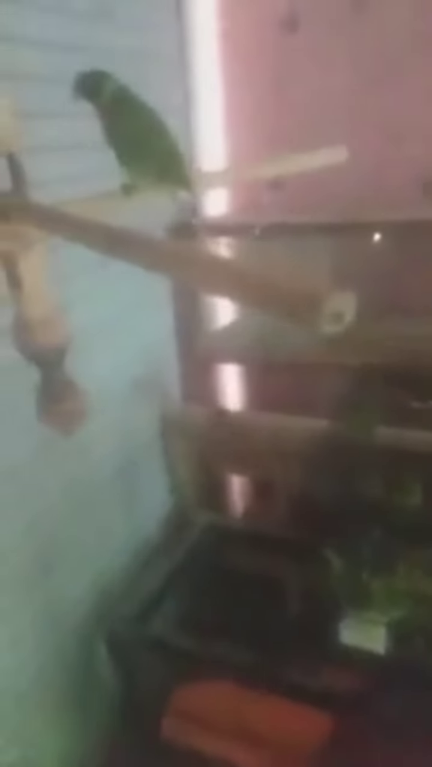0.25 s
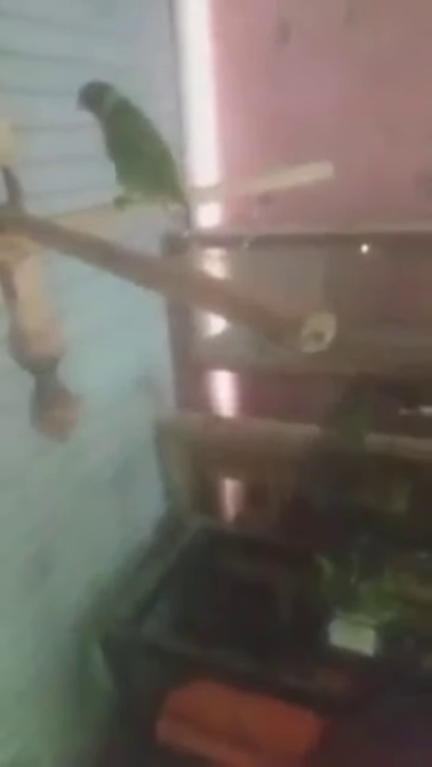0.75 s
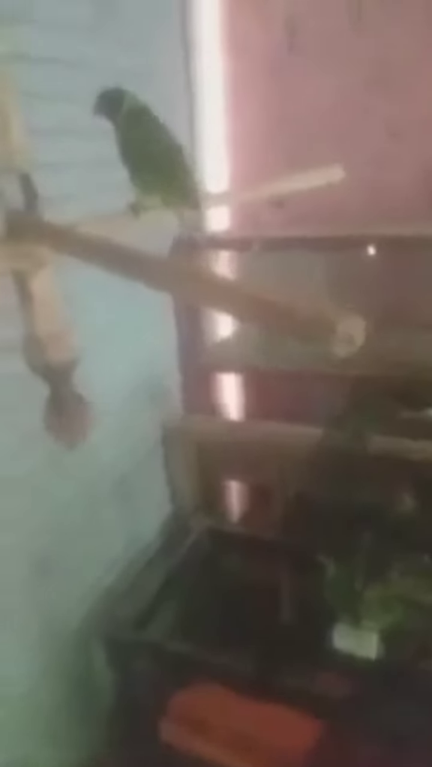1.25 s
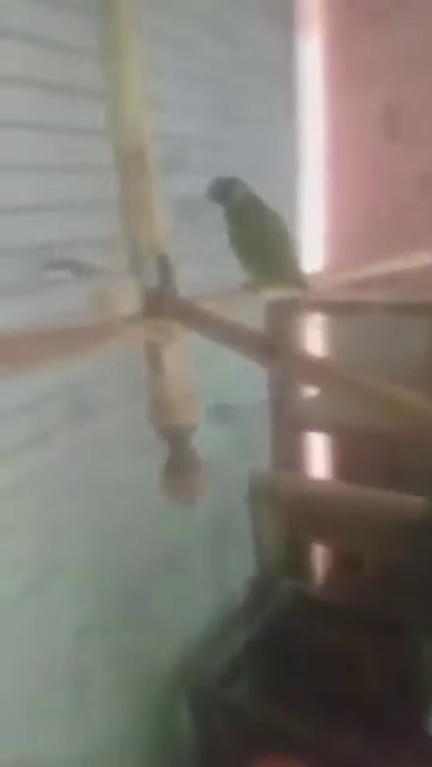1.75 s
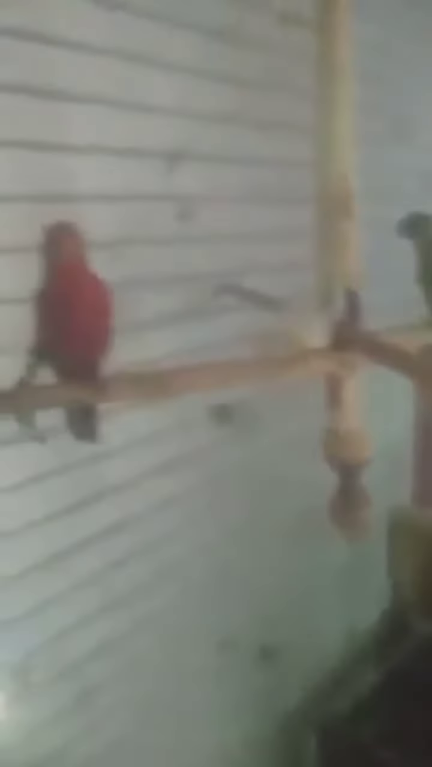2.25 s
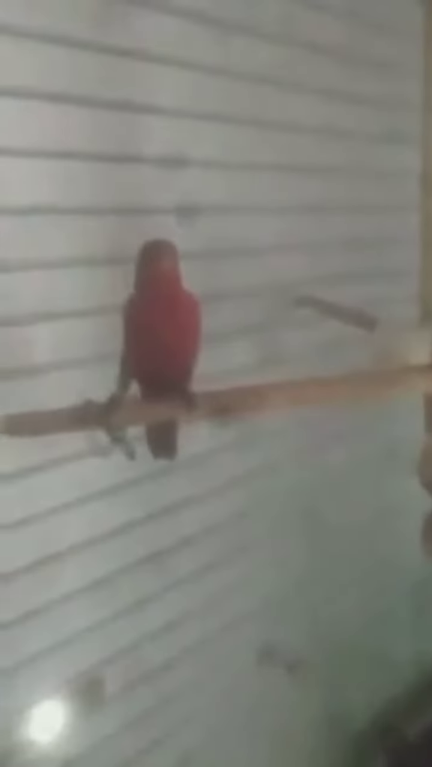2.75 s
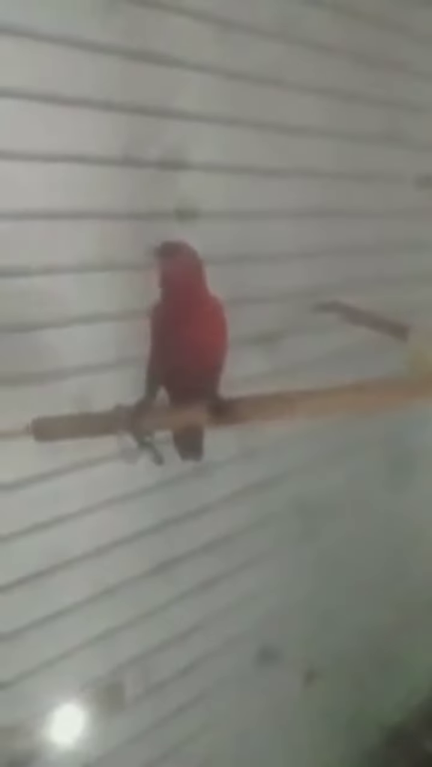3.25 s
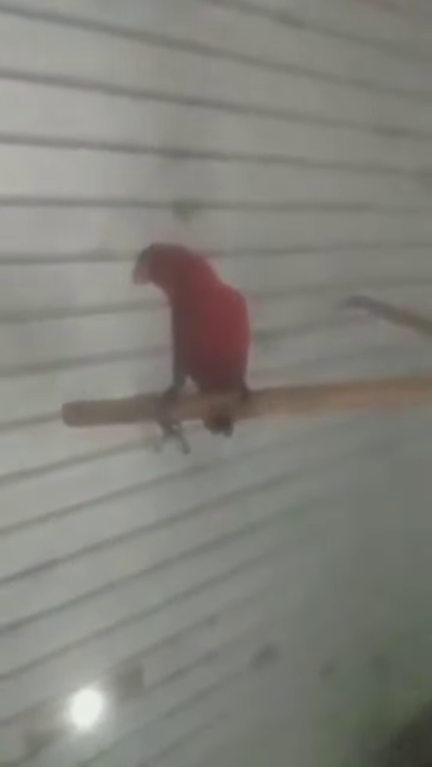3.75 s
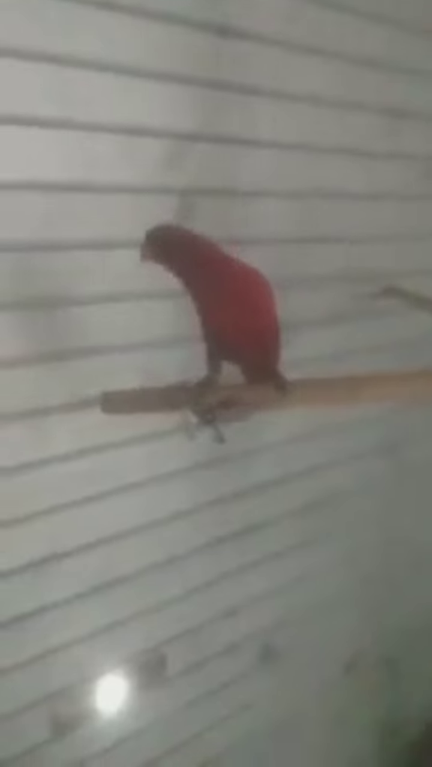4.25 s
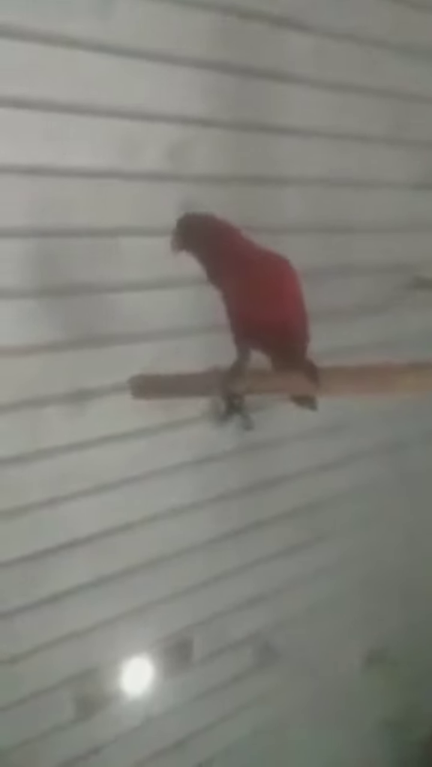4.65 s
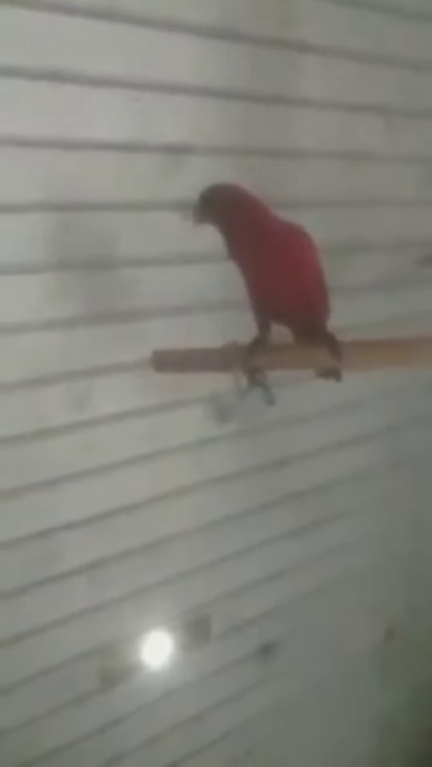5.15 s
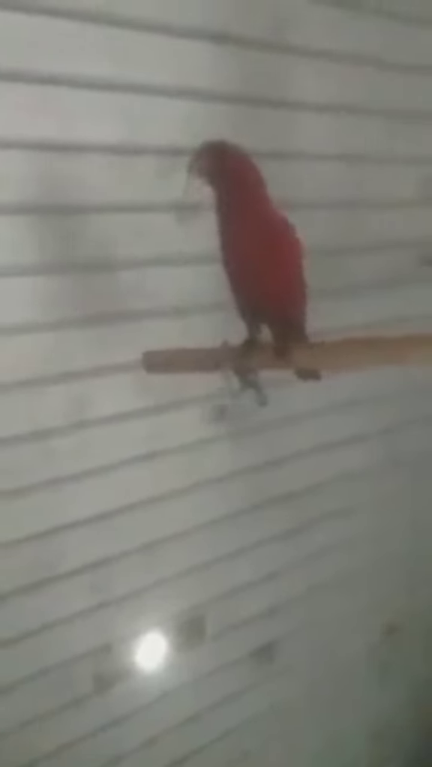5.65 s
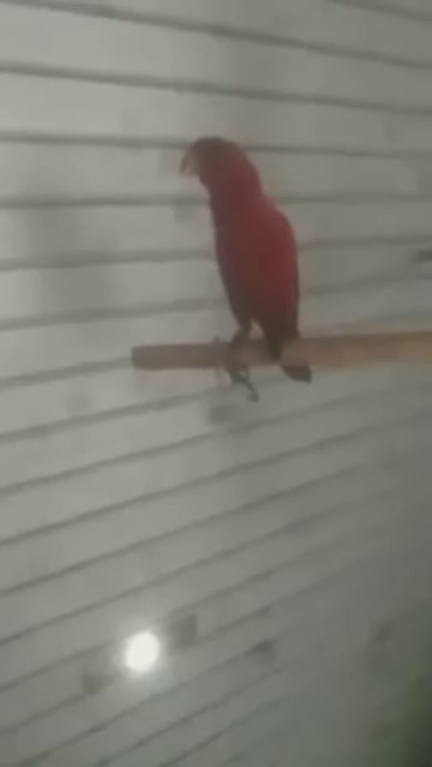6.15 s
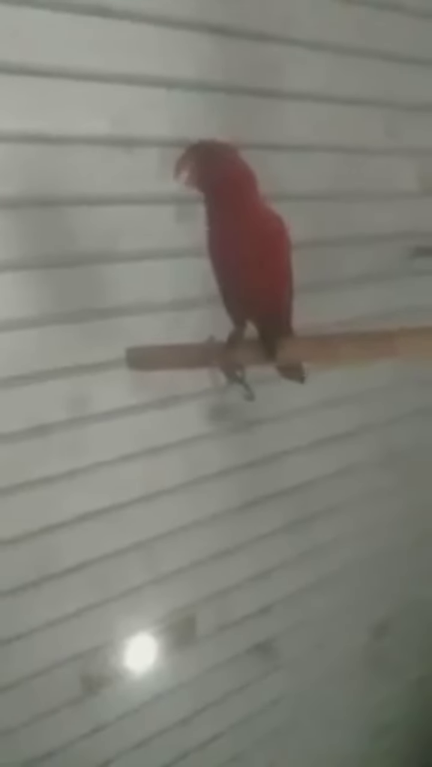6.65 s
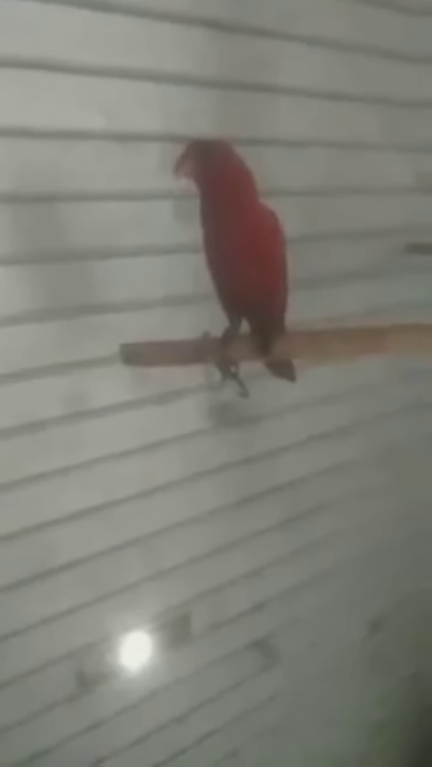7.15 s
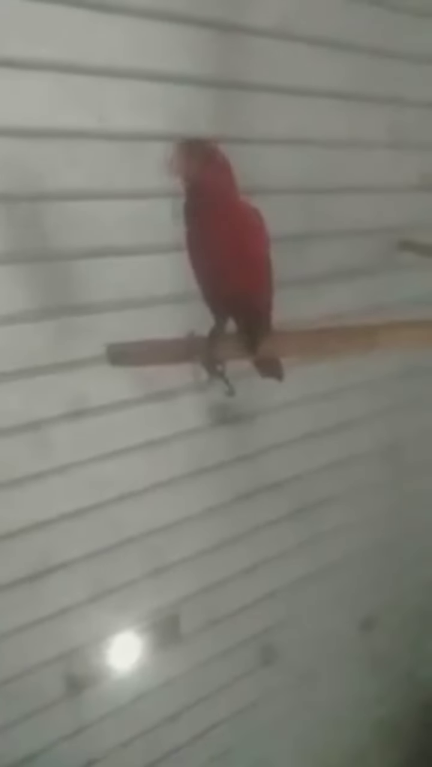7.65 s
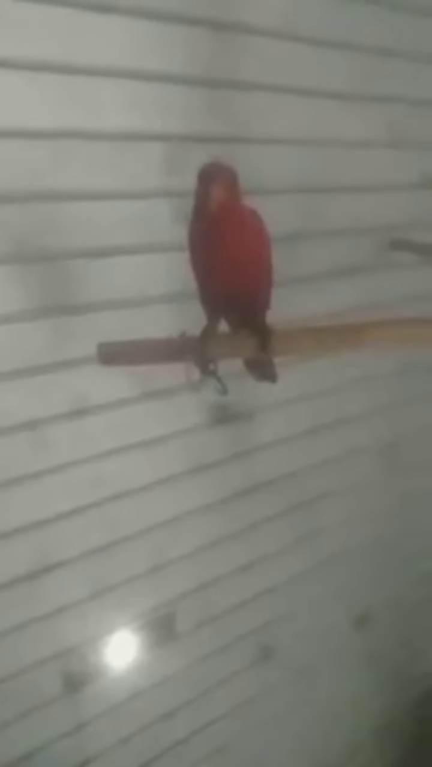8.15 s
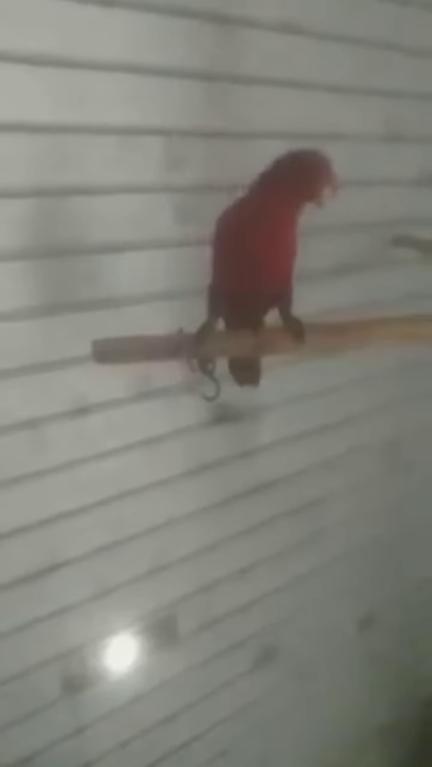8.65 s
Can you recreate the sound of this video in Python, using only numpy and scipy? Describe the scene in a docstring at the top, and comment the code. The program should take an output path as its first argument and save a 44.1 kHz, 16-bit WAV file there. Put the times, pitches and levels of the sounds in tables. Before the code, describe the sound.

Two parrots squawk loudly at close range, each buzzy rising note snapping into a piercing whistle, with chirps and soft coos in an echoing small room.

```python
"""Two parrots call close to the microphone in a small hard-walled room: a rising buzzy squawk flips into a
loud arched whistle. Further birds chirp and peep, soft coos come between, a machine hums faintly under the
room air, and something scuffs now and then. Voices are stacked harmonics shaped by a throat and roughened by
breath; whistles are gliding tones, scuffs and air are filtered noise. The loudest whistles overdrive the mic."""
import sys
import numpy as np
from scipy import signal
from scipy.fft import rfft, irfft
from scipy.io import wavfile
from scipy.ndimage import uniform_filter1d, minimum_filter1d

SR = 44100
rng = np.random.default_rng(int(sys.argv[2]) if len(sys.argv) > 2 else 0)


def put_to_file(sound):
    """Save the sound as 16-bit audio at rate SR, in the file named by the first command-line argument."""
    columns = np.atleast_2d(sound).T  # one column per channel
    safe = np.clip(columns, -1, 1)
    whole_steps = np.round(safe * 32767)
    wavfile.write(sys.argv[1], SR, whole_steps.astype(np.int16))


N = 392490
LEAD_S = .2  # run-in before time zero, so that a call can already be sounding at the start
TOP_HZ = 15750  # upper edge of the microphone's range


def undb(db):
    """Turn decibels into an amplitude factor."""
    return 10 ** (np.asarray(db) / 20)


def along(table, hz):
    """Read a (frequency [Hz], value) table on a log-frequency axis."""
    table_hz, values = np.transpose(table)
    return np.interp(np.log(hz), np.log(table_hz), values)


def band(x, lo_hz, hi_hz):
    """Keep the sound between two frequencies."""
    return signal.sosfilt(signal.butter(2, [lo_hz, hi_hz], "band", fs=SR, output="sos"), x)


def wobble(n, rate):
    """Smooth random drift of spread 1, averaged over windows of 1/rate seconds."""
    k = max(int(SR / rate), 1)
    noise = rng.standard_normal(n + 4 * k)
    smooth = uniform_filter1d(uniform_filter1d(noise, k), k)[2 * k:-2 * k]
    return smooth * np.sqrt(1.724 * k)


def swell(t, length, attack, release):
    """Straight fade in and out, times in seconds."""
    return np.clip(np.minimum(t / attack, (length - t) / release), 0, 1)


def add(track, start, sound):
    """Mix a sound into a track at its start time in seconds."""
    i = int((start + LEAD_S) * SR)
    track[i:i + len(sound)] += sound[:len(track) - i]


# Tone colour of the room air: (frequency [Hz], relative level [dB])
AIR_COLOUR = [(30, -38.5), (60, -16.5), (130, -6.5), (300, -12), (600, -16.5), (1300, -16), (3000, -16),
              (5000, -26.5), (8000, -48), (15000, -76.5)]
# Slow rise and fall of the room air: (time [s], level [dB])
AIR_LEVEL = [(0, -59), (1.001, -63.5), (1.2, -57.5), (3.3, -60.5), (4.3, -59.5), (5.6, -59.5), (6.601, -56),
             (7.401, -56), (8.9, -53)]


def room_air():
    """Coloured noise whose level swells and sinks, slowly by the table and faster by chance."""
    hz = np.maximum(np.fft.rfftfreq(N, 1 / SR), 1)
    air = irfft(rfft(rng.standard_normal(N)) * undb(along(AIR_COLOUR, hz)), N)
    level_db = np.interp(np.arange(N) / SR, *np.transpose(AIR_LEVEL))
    return air / np.std(air) * undb(level_db + 1.7 * wobble(N, 8.8))


def machine_hum():
    """One low sine that wavers in pitch and level."""
    hum_hz, hum_db = 120, -65.5  # level is RMS, before the wavering
    pitch = hum_hz * (1 + 0.013 * wobble(N, 7.1))
    hum = np.sin(2 * np.pi * np.cumsum(pitch) / SR)
    return np.sqrt(2) * hum * undb(hum_db + 1.4 * wobble(N, 11))


# Faint scuffs: (time [s], length [s], level before filtering [dB], hollow ring [Hz])
SCUFF_EVENTS = [(1.052, 0.032, -63, 582), (7.169, 0.045, -50, 425), (7.39, 0.073, -62, 810),
                (7.553, 0.059, -55, 425)]


def scuffs(track):
    """Short rubs of grainy noise, with a narrower band boosted for a hollow ring."""
    for start, length, db, ring_hz in SCUFF_EVENTS:
        t = np.arange(int(length * SR)) / SR
        grain = undb(0.97 * wobble(len(t), 53))
        rub = rng.standard_normal(len(t)) * grain * np.sin(np.pi * t / length)
        body = 3.8 * band(rub, 150, 2800)
        ring = 9 * band(rub, 0.874 * ring_hz, 1.3 * ring_hz)
        add(track, start, undb(db) * (body + ring))


def sing(track, start, length, hz, db, throat, *, scoop, scoop_s, climb, lateness=1, tilt_db=0, rasp,
         jitter, shimmer_db, breath, attack, release, halving=0.):
    """Harmonics of the syrinx scoop up to pitch and pass the throat; rasp shakes the pitch and adds breath.

    scoop and climb are shares of the end pitch; a negative climb arches above it.
    halving is the strength of the odd harmonics when the note is built an octave down.
    """
    t = np.arange(int(length * SR)) / SR
    glide = 1 - scoop * np.exp(-t / scoop_s) - climb * (1 - (t / length) ** lateness)
    pitch = hz * glide * (1 + jitter * rasp * wobble(len(t), 300))
    throat_hz = pitch
    if halving:
        pitch = pitch / 2
        throat_hz = hz / 2  # overtones keep their order of strength through the scoop
    phase = 2 * np.pi * np.cumsum(pitch) / SR
    note = 0
    for k in range(1, 14):
        tilt = tilt_db * np.log2(k * pitch / 4500)  # the beak's tilt, in dB per octave
        shimmer = shimmer_db * wobble(len(t), 121.4)
        gain = undb(along(throat, k * throat_hz) + tilt + shimmer)
        if halving and k % 2:
            # every second cycle weakens late in the note, so the lower octave shows
            gain = gain * halving * np.clip((t / length - .45) / 0.12, 0, 1)
        high_breath = np.maximum(k * pitch - 8400, 0) / 400  # overtones above 8400 Hz turn breathy
        smear = np.clip(breath * rasp + high_breath, 0, .8)
        tone = np.sqrt(1 - smear ** 2) + smear * wobble(len(t), 1800)
        note = note + gain * tone * np.sin(k * phase + k * k) * (k * pitch < TOP_HZ)
    add(track, start, undb(db) * swell(t, length, attack, release) * note)


# Soft coos: (time [s], length [s], end pitch of the upper octave [Hz], level before the throat [dB])
COO_CALLS = [(0.174, 0.33, 2220, -52.5), (2.708, .24, 2145, -50.5), (5.1, .273, 2177, -50.5),
             (6.552, 0.28, 2204, -49.5)]
# What the cooing throat passes: (frequency [Hz], gain [dB])
COO_PASS = [(1100, 0.5), (2200, 4.4), (3300, -22.5), (4400, -7.5), (5500, 1.5), (6600, -47), (9000, -60)]


def coos(track):
    """Long soft notes that scoop up from far below, with a lower octave coming in late."""
    for start, length, hz, db in COO_CALLS:
        sing(track, start, length, hz, db, COO_PASS, scoop=.58, scoop_s=.025, climb=.06, rasp=.09,
             jitter=.02, shimmer_db=4.0, breath=.9, attack=0.013, release=0.018, halving=0.2)


# Thin peeps: (time [s], length [s], arch above the end pitch [share], level before the throat [dB])
PEEP_CALLS = [(4.405, .055, .13, -42), (6.418, .088, .3, -34)]
# What the peeping throat passes: (frequency [Hz], gain [dB])
PEEP_PASS = [(2500, -4), (5200, 3.5), (7600, -9), (10000, -23)]


def peeps(track):
    """Thin notes that scoop up, arch over and fall late to 2250 Hz."""
    for start, length, arch, db in PEEP_CALLS:
        sing(track, start, length, 2250, db, PEEP_PASS, scoop=.25, scoop_s=.016, climb=-arch, lateness=3.5,
             rasp=.55, jitter=0.015, shimmer_db=1.5, breath=0.62, attack=0.0074, release=0.0055)


# Further birds' chirps: (time [s], length [s], end pitch [Hz], level before the throat [dB],
# beak tilt [dB per octave], rasp [0-1])
CHIRP_CALLS = [(0.804, 0.053, 1950, -39.5, 3.5, 0.76), (1.578, 0.023, 1594, -46.5, -8.5, 0.55),
               (3.125, .067, 1903, -41.5, 0.7, 0.68), (3.252, 0.058, 1614, -44.5, 0.3, 0.69),
               (4.951, 0.074, 2030, -41.5, 4.5, 0.73), (5.192, 0.036, 1660, -39.5, -3.5, 0.63),
               (5.212, 0.046, 1940, -33.5, 5.5, 0.26), (5.295, 0.075, 1804, -33, -1, 0.37),
               (5.655, 0.062, 1406, -34.5, 4, 0.9), (5.747, .038, 1635, -31.5, 3.5, .8),
               (5.773, 0.042, 1924, -30.5, 2, 0.59), (6.17, .04, 2190, -26.5, 2.5, 0.67),
               (6.296, 0.058, 1990, -36, 2.5, 0.6), (8.352, 0.038, 2560, -35, 2.7, 0.4)]
# What the chirping throat passes: (frequency [Hz], gain [dB])
CHIRP_PASS = [(1500, -8), (3600, 4.5), (5600, -0.5), (7600, -2), (9000, -21), (13000, -24)]


def chirps(track):
    """Short raspy notes that scoop up and stop almost at once."""
    for start, length, hz, db, tilt_db, rasp in CHIRP_CALLS:
        sing(track, start, length, hz, db, CHIRP_PASS, scoop=0.38, scoop_s=.019, climb=.02, tilt_db=tilt_db,
             rasp=rasp, jitter=.05, shimmer_db=2.5, breath=0.52, attack=0.028, release=0.0018)


# Near calls, squawk then whistle: (time [s], bird, squawk length [s], squawk end pitch [Hz],
# scoop time [s], squawk level before the throat [dB], whistle length before its hold [s],
# whistle bottom pitch [Hz], whistle level before its fall and shimmer [dB])
NEAR_CALL_LIST = [(-.18, "low", .12, 1175, .008, -27.5, 0.052, 4450, -17.5),
                  (0.398, "high", 0.13, 1237, .018, -16, 0.037, 4356, -5),
                  (0.468, "low", 0.13, 1172, 0.011, -18.5, 0.064, 4540, -9),
                  (1.191, "high", 0.096, 1333, 0.023, -17.5, 0.036, 4347, -7.5),
                  (1.299, "low", 0.12, 1185, .008, -15.5, 0.058, 4610, -9),
                  (1.744, "high", 0.12, 1352, 0.017, -14, 0.032, 4216, -6),
                  (1.938, "low", 0.13, 1175, 0.01, -17.5, .052, 4796, -9),
                  (2.15, "high", .103, 1376, 0.015, -13.5, .031, 4325, -6.5),
                  (2.428, "high", 0.12, 1385, .012, -13, 0.031, 4350, -6),
                  (2.724, "high", 0.13, 1415, 0.017, -14.5, .032, 4450, -7),
                  (3.468, "high", .13, 1328, 0.019, -14.5, .028, 4446, -7.5),
                  (3.774, "low", .12, 1176, 0.0064, -18, 0.056, 4516, -11),
                  (4.467, "high", .118, 1251, .025, -18, .033, 4285, -10),
                  (5.917, "high", .139, 1237, 0.019, -12, 0.03, 4290, -6.5),
                  (6.801, "high", 0.13, 1369, 0.021, -13, 0.029, 4610, -6),
                  (7.782, "high", 0.14, 1352, .016, -15.5, 0.029, 4480, -9),
                  (8.045, "low", 0.12, 1160, .007, -18, 0.049, 4810, -9),
                  (8.69, "high", 0.17, 1261, 0.01, -18.5, 0.045, 4290, -11)]
# Each bird's squawk: (scoop [share of end pitch], climb [share of end pitch],
# climb lateness [power of time], beak tilt [dB per octave], rasp [0-1])
SQUAWK_HABITS = {"high": (.35, .025, 1.084, 1.2, 0.24), "low": (.1, .07, 2.2, 2.05, 0.36)}
# What the squawking throat passes: (frequency [Hz], gain [dB])
SQUAWK_PASS = [(1200, -20), (2700, -22), (3350, -10), (3700, -.5), (4300, -.1), (5400, -2.5), (6700, -11),
               (8000, -17), (9000, -36), (10500, -32), (13000, -38)]


def squawks(track):
    """Buzzy notes that climb to their end pitch and cut off where the whistle takes over."""
    for start, bird, length, hz, scoop_s, db, *_ in NEAR_CALL_LIST:
        scoop, climb, lateness, tilt_db, rasp = SQUAWK_HABITS[bird]
        sing(track, start, length, hz, db, SQUAWK_PASS, scoop=scoop, scoop_s=scoop_s, climb=climb,
             lateness=lateness, tilt_db=tilt_db, rasp=rasp,
             jitter=0.013, shimmer_db=3.5, breath=0.9, attack=0.03, release=0.00033)


# Each bird's whistle: (top pitch [multiple of the squawk's end pitch], start pitch [share of the top],
# rising stretch [share of the length], rasp while rising [0-1])
WHISTLE_HABITS = {"high": (4.9, .8, .2, .15), "low": (5.5, .76, .86, .6)}
# The whistle's breathy octave: (frequency [Hz], gain [dB])
OCTAVE_PASS = [(8600, -25.5), (10000, -17.5), (12000, -24.5), (13500, -10.5)]


def whistles(track, hold=0.012):
    """A near-pure tone springs hoarsely to its top, sags, breaks downward and settles at the bottom."""
    for start, bird, squawk_s, squawk_hz, _, _, whistle_s, bottom_hz, db in NEAR_CALL_LIST:
        multiple, start_share, rise_share, hoarse = WHISTLE_HABITS[bird]
        rise, fall = rise_share * whistle_s, (1 - rise_share) * whistle_s
        top_hz = multiple * squawk_hz
        t = np.arange(int((rise + fall + hold) * SR)) / SR
        spring = np.sin(np.pi / 2 * np.clip(t / rise, 0, 1)) ** .5
        up = top_hz * (start_share + (1 - start_share) * spring)
        fall_share = np.clip((t - rise) / fall, 0, 1)
        # the steep step near 0.7 is the break
        drop = np.interp(fall_share, [0, .25, .67, .73, 1], [0, .13, .52, .86, 1])
        down = (top_hz - bottom_hz) * uniform_filter1d(drop, size=60)
        rasp = hoarse * (t < rise)  # only the rising stretch is hoarse
        pitch = (up - down) * (1 + (0.0035 + 0.03 * rasp) * wobble(len(t), 260))
        phase = 2 * np.pi * np.cumsum(pitch) / SR
        tone = (np.sqrt(1 - rasp ** 2) + rasp * wobble(len(t), 1400)) * np.sin(phase)
        octave = undb(along(OCTAVE_PASS, 2 * pitch)) * wobble(len(t), 2500) * np.sin(2 * phase)
        level = undb(db + 1.3 * drop + 1.83 * wobble(len(t), 200))
        add(track, start + squawk_s, level * swell(t, t[-1], 0.003, 0.0094) * (tone + octave))


# Time the echoes take to fall by 60 dB: (frequency [Hz], decay time [s])
ECHO_DECAY = [(1000, 0.64), (4500, 0.38), (7000, 0.39), (12000, 0.34)]


def room(x, wet_db, build_s, scatter_db):
    """Straight sound plus wall echoes: uneven at first, building into a tail that dies sooner in the treble."""
    t = np.arange(int(.7 * SR)) / SR
    unevenness = undb(scatter_db * np.exp(-t / 0.04) * rng.standard_normal(len(t)))
    echoes = rng.standard_normal(len(t)) * unevenness
    edges = 300 * 2 ** np.arange(0, 6.1, .5)  # half-octave bands [Hz]
    tail = 0
    for lo, hi in zip(edges, edges[1:]):
        decay = undb(-60 * t / along(ECHO_DECAY, np.sqrt(lo * hi)))
        tail = tail + band(echoes, lo, hi) * decay
    tail = tail * np.clip(t / build_s, 0, 1)
    tail = tail / np.sqrt(np.sum(tail ** 2))
    return x + undb(wet_db) * signal.fftconvolve(x, tail)[:len(x)]


def scene():
    """Near and far sources each excite the room, the far ones with more echo; air and hum lie under them."""
    near, far = np.zeros((2, N + int(LEAD_S * SR)))
    scuffs(near)
    coos(near)
    peeps(far)
    chirps(far)
    squawks(near)
    whistles(near)
    near_heard = room(near, wet_db=-0.13, build_s=0.019, scatter_db=4.2)
    far_heard = room(far, wet_db=4.8, build_s=0.0023, scatter_db=3.1)
    return ((near_heard + far_heard)[-N:] + room_air() + machine_hum())[None]


def record(dry):
    """Driven hard, the capsule swings further one way, most in the treble, so loud whistles thump lower down.

    A limiter holds the direct sound's peaks, and a steep low-pass cuts the top.
    """
    excess = np.clip(np.abs(band(dry, 4700, 13000)) - .22, 0, 1) ** 2
    thump = signal.sosfilt(signal.butter(3, [85, 1300], "band", fs=SR, output="sos"), excess)
    peak = -minimum_filter1d(-np.abs(dry), size=89)  # highest level within about 1 ms either side
    gain = uniform_filter1d(np.minimum(.96 / (peak + 1e-9), 1), size=45)
    low_pass = signal.ellip(10, .2, 80, TOP_HZ, fs=SR, output="sos")
    return signal.sosfilt(low_pass, gain * dry + 0.24 * thump)


dry = scene()
out = record(dry)
put_to_file(out)
```